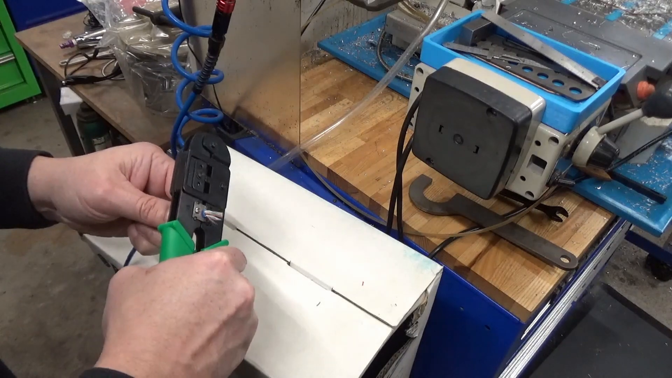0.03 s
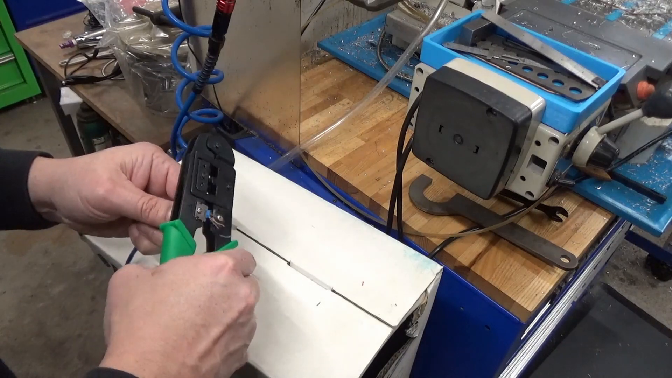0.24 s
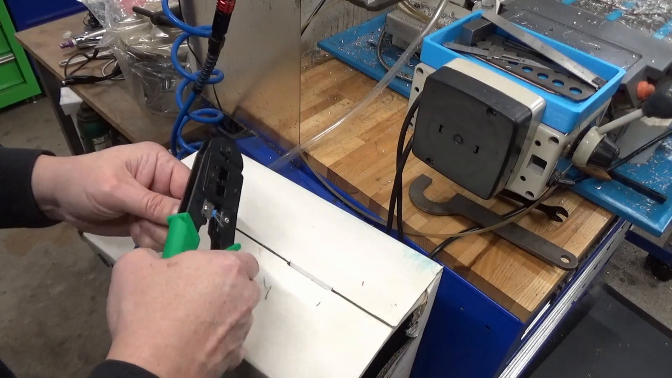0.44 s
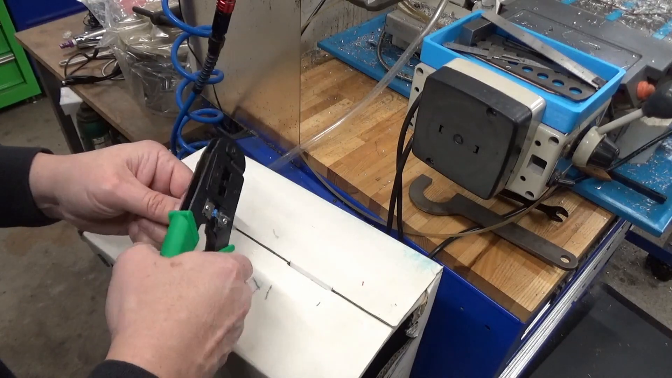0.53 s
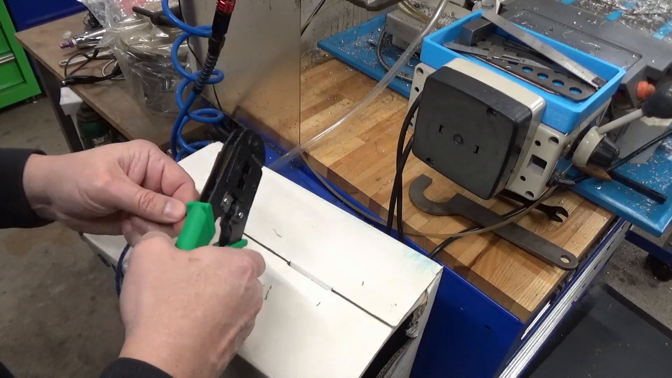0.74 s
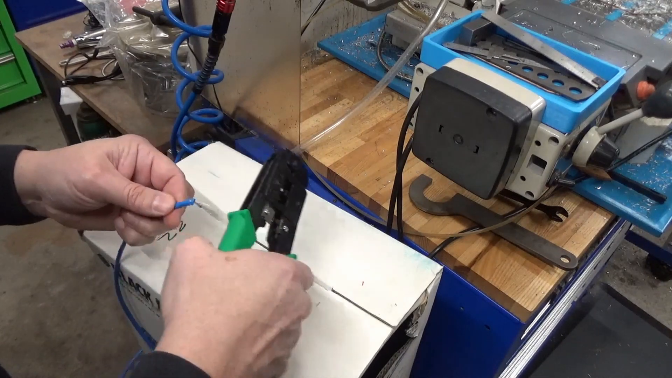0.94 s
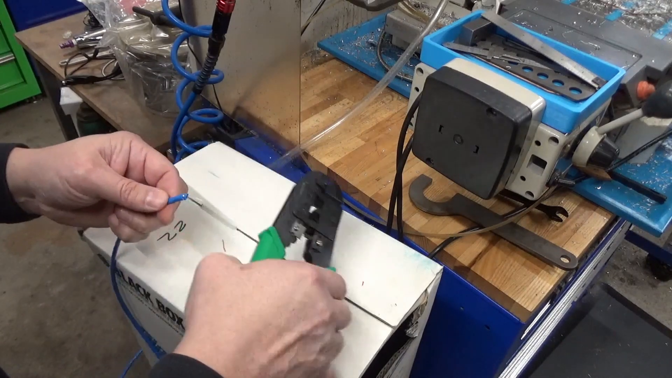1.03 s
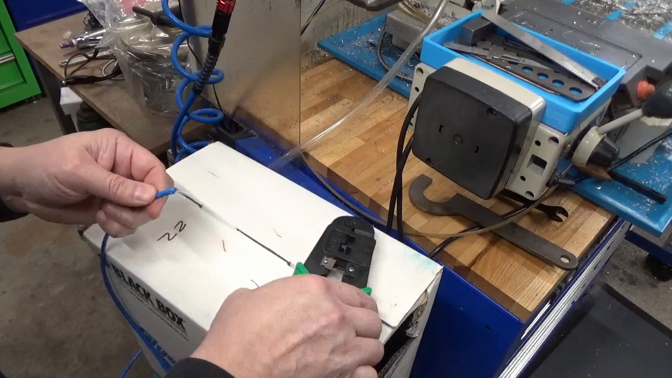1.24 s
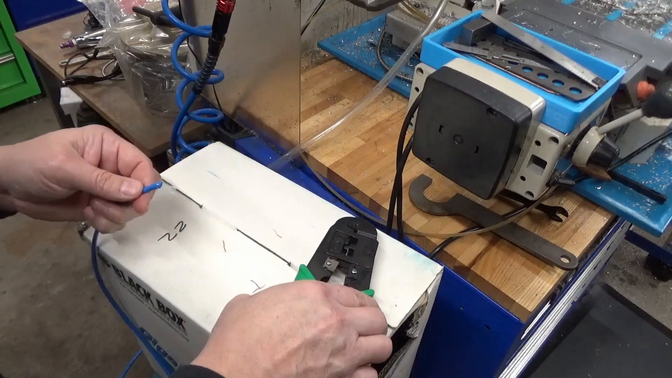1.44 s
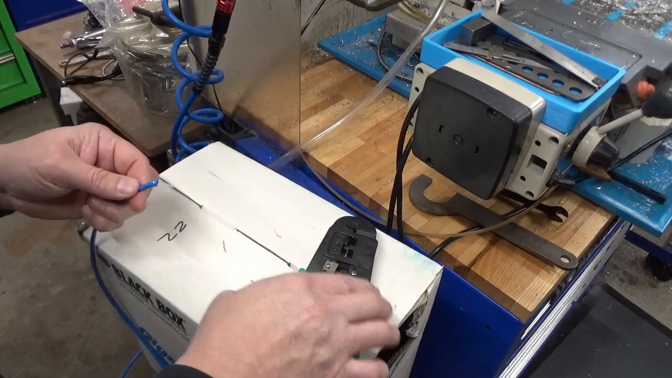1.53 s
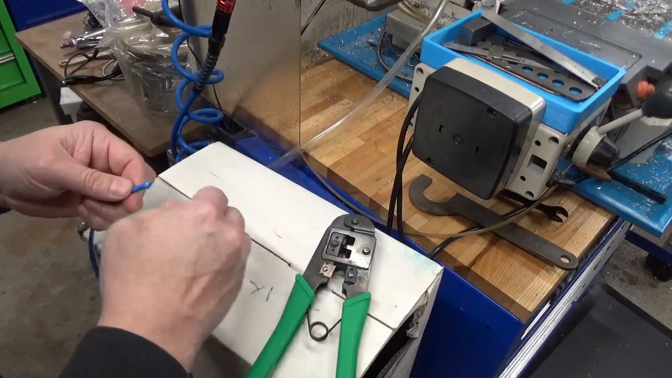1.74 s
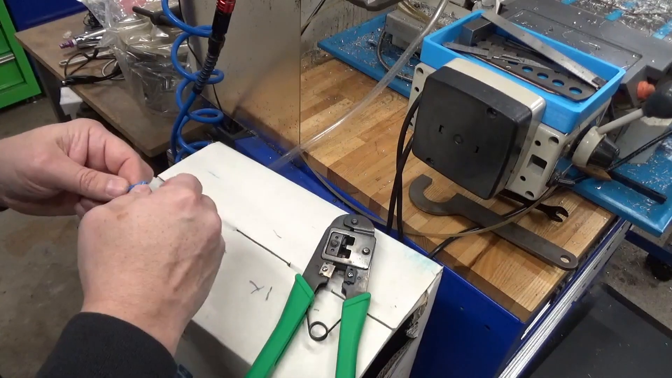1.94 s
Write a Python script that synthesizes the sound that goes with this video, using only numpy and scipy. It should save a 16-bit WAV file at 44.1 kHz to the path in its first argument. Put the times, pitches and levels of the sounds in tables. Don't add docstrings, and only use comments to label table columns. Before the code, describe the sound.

Steel crimping pliers click in a quick burst, pause, then clunk and rattle onto a box

```python
import sys
import numpy as np
from scipy import signal
from scipy.fft import rfft, irfft
from scipy.io import wavfile

SR = 44100
rng = np.random.default_rng(int(sys.argv[2]) if len(sys.argv) > 2 else 0)


def natural_amplitude(level_db):
    exponent = np.asarray(level_db, float) / 20
    return 10 ** exponent


def to_wav(sig):
    pcm = np.clip(np.atleast_2d(sig), -1, 1) * 32767
    pcm = np.round(pcm).astype(np.int16)
    wavfile.write(sys.argv[1], SR, pcm.T)


N = 85995


def rms_one(x):
    return x / np.sqrt(np.mean(x ** 2) + 1e-20)


def high_pass(x, hz):
    return signal.sosfilt(signal.butter(2, hz, "high", fs=SR, output="sos"), x)


def in_time(rows):
    s, *columns = np.transpose(rows)
    t = np.arange(N) / SR
    return [natural_amplitude(np.interp(t, s, column, -120, -120)) for column in columns]


def colour(x, points):
    hz, db = np.transpose(points)
    f = np.maximum(np.arange(N // 2 + 1) * SR / N, 1)
    gain = natural_amplitude(np.interp(np.log(f), np.log(hz), db))
    return rms_one(irfft(rfft(x) * gain, N))


def side_only(x):
    bass_db = -13
    return high_pass(x, 750) + natural_amplitude(bass_db) * x


def wide(source, side_db):
    mid = source()
    side = side_only(source())
    return mid + natural_amplitude(side_db) * side * [[1], [-1]]


def ring(force, hz, t60):
    r, w = natural_amplitude(-60 / (t60 * SR)), 2 * np.pi * hz / SR
    return signal.lfilter([0, np.sin(w)], [1, -2 * r * np.cos(w), r * r], force + 1e-18)


def strike(s, db, modes, contact, centre_hz=None, fall_db=0, sign=-1):
    mode_spread_db, fall_limit_db = 1.5, 22
    out = np.zeros(N)
    spread = mode_spread_db * rng.standard_normal((len(s), len(modes)))
    n = np.arange(contact.shape[1])
    at = (np.clip(s, 0, None) * SR).astype(int)[:, None] + n
    for k, (hz, level_db, t60) in enumerate(modes):
        off_db = 0
        if centre_hz is not None:
            off_db = np.minimum(fall_db * np.log2(hz / centre_hz) ** 2, fall_limit_db)
        push = np.abs(contact @ np.exp(2j * np.pi * hz / SR * n))
        gain = natural_amplitude(db + level_db + spread[:, k] - off_db) / np.maximum(push, .5)
        force = np.zeros(N)
        np.add.at(force, at, gain[:, None] * contact * sign ** k)
        out += ring(force, hz, t60)
    return out


CHATTER_S = .0017


def chatter(count, length_s):
    t = np.arange(200) / SR
    fade = np.exp(-t / length_s - (t / length_s) ** 4)
    force = rng.standard_normal((count, len(t))) * fade
    force[:, 0] = 6.0
    return force / np.sqrt(np.sum(force ** 2, axis=1, keepdims=True))


def grains():
    grains_per_s, spread_db = 5100, 1
    sizes = natural_amplitude(spread_db * np.minimum(rng.exponential(1, N), 5)) * rng.choice([-1, 1], N)
    return sizes * (rng.random(N) < grains_per_s / SR)


# [f/Hz, level/dB]
AIR_COLOUR = [(18, -4.5), (30, -0.5), (65, -32), (121, -6.5), (319, -15.5), (487, -14.5), (1320, -18),
              (9660, -28.5), (11500, -35), (15000, -79), (22000, -120)]


def workshop_air():
    air = wide(lambda: colour(rng.standard_normal(N), AIR_COLOUR), side_db=-3.5)
    hum = rms_one(ring(rng.standard_normal(N), hz=121, t60=0.3))
    duct = rms_one(ring(rng.standard_normal(N), hz=310, t60=0.072))
    return natural_amplitude(-61) * air + natural_amplitude(-68) * hum + natural_amplitude(-69) * duct


FALL_DB = 45

# [f/Hz, level/dB, t60/s]
MOTOR_MODES = [(2630, -1.1, 0.033), (2940, -0.72, 0.029), (3400, -2.2, 0.0092)]


def motor():
    start_s, period_s, level_db = .00882, .03338, -61.5
    s = np.arange(start_s, N / SR - .01, period_s)
    hz = np.where(np.arange(len(s)) % 2, 3140, 2650)
    force = chatter(len(s), CHATTER_S)
    return strike(s, level_db, MOTOR_MODES, force, hz, FALL_DB)


SCRAPE_SIDE_DB = -11

# [t/s, hiss level/dB, box rumble level/dB]
SLIDE = [(0.95, -75, -65), (1.15, -74.5, -57), (1.27, -66.5, -53.5), (1.36, -52.5, -50.5),
         (1.42, -66.5, -56), (1.49, -65.5, -53.5), (1.52, -44.5, -51.5), (1.55, -62, -43.5),
         (1.6, -70, -65), (1.63, -49.5, -38.5), (1.7, -63.5, -55), (1.76, -73, -51.5), (1.85, -67.5, -65)]
# [f/Hz, level/dB]
SLIDE_COLOUR = [(600, -40), (1500, -17), (3000, -8), (4500, -8), (7800, 0), (10600, -5), (11500, -12)]


def sliding():
    hiss_gain = in_time(SLIDE)[0]
    return hiss_gain * wide(lambda: colour(grains(), SLIDE_COLOUR), SCRAPE_SIDE_DB)


# [t/s, level/dB]
STRIP = [
    (.23, -60),
    (.245, -52.5),
    (.3, -45),
    (.39, -51),
    (.46, -46.5),
    (.55, -49.5),
    (.61, -53.5),
    (.66, -62),
]
# [f/Hz, level/dB]
STRIP_COLOUR = [(150, -37), (300, 10), (600, 8.5), (1700, 7.5), (3000, 5.5), (7300, 2), (10700, -3),
                (11500, -39)]


def stripping():
    drag_gain = in_time(STRIP)[0]
    return drag_gain * wide(lambda: colour(grains(), STRIP_COLOUR), SCRAPE_SIDE_DB)


# [t/s, peak level/dB, centre f/Hz]
KNOCKS = [(0.0, -49.5, 324), (1.196, -39, 385), (1.199, -44, 655), (1.294, -21.5, 606), (1.294, -36, 330),
          (1.296, -26, 140), (1.308, -29, 610), (1.377, -22.5, 580), (1.378, -26.5, 358), (1.38, -21, 116),
          (1.405, -35, 514), (1.459, -39.5, 385), (1.527, -27.5, 310), (1.527, -29.5, 560),
          (1.543, -31.5, 570), (1.575, -43, 330), (1.608, -20, 750), (1.612, -21.5, 303), (1.62, -15, 445),
          (1.617, -19, 110), (1.626, -11, 155), (1.643, -21.5, 317), (1.646, -26, 795), (1.664, -26, 334),
          (1.666, -27, 720), (1.689, -33.5, 616), (1.705, -26, 172), (1.729, -25.5, 780),
          (1.742, -30.5, 183)]
# [f/Hz, level/dB, t60/s]
BOX_MODES = [(104, -21, 0.016), (140, -14, 0.074), (172, -6, 0.135), (216, -10.5, 0.062),
             (277, -10.5, 0.061), (329, 0, 0.088), (385, -2, 0.081), (445, 1, 0.047), (532, -10, 0.053),
             (595.4, 0.5, 0.066), (714, -10, 0.041), (780, -4.5, 0.027), (903, 1, 0.011),
             (1330, 11.5, 0.0037)]


def box():
    contact_s, low_hz = .0009, 76
    s, db, hz = np.transpose(KNOCKS)
    push = np.hanning(int(contact_s * SR))[None]
    knocks = strike(s, db - 7, BOX_MODES, push / push.sum(), hz, FALL_DB, sign=0.97)
    rub = grains()
    rumble = rms_one(sum(natural_amplitude(level_db) * ring(rub, f, t60) for f, level_db, t60 in BOX_MODES))
    card = knocks + in_time(SLIDE)[1] * rumble
    return high_pass(high_pass(card, low_hz), low_hz)


# [t/s, jaw level/dB, jaw centre f/Hz, relative blade level/dB, relative handle level/dB]
SNAPS = [(0.2386, -8, 3650, -15, -10.5), (0.2652, -6.5, 3930, -12.5, -10.5), (0.2838, -22.5, 3300, 0, 3.5),
         (0.2910, -7, 4400, -4, -11.5), (0.2931, -9.5, 4300, -0.5, -32), (.33, -13, 2800, -12.5, -16.5),
         (0.3629, -18, 3300, -12.5, -8), (0.402, -17.5, 3340, -19, -26), (0.4097, -22.5, 3500, -2.5, -3),
         (0.4132, -12.5, 3220, -4.5, -13.5), (.424, -24.5, 4100, 8, -2.5), (.4455, -21.5, 3070, 5, -11),
         (0.449, -16, 3150, 2, -9.5), (0.4752, -21.5, 3580, 3, -13.5), (0.478, -28, 3550, 3, -31)]
# [t/s, peak level/dB, centre f/Hz]
TICKS = [(0.1203, -48, 6000), (0.1264, -44, 8000), (.133, -50, 7000), (.1886, -49, 7000), (.201, -50, 9500),
         (.2113, -49, 2800), (.2135, -40, 8500), (.2325, -40, 6000), (0.298, -16.5, 6500),
         (0.3262, -24, 3400), (.354, -23, 4150), (.4915, -29.5, 7260), (.499, -24, 3500), (.507, -31, 4520),
         (0.515, -32, 6500), (0.5215, -24.5, 3520), (0.5265, -23.5, 3800), (0.5345, -30.5, 8800),
         (0.5392, -26.5, 6900), (0.549, -31, 8700), (0.5583, -27, 4420), (.5585, -28, 7600),
         (.5655, -31.5, 7000), (0.573, -32.5, 4540), (.578, -43, 8500), (.5868, -32.5, 6500),
         (.59, -35.5, 3000), (0.602, -35.5, 7000), (0.616, -44.5, 7000), (.935, -40.5, 8360)]
# [t/s, peak level/dB, centre f/Hz]
RATTLE = [(1.18, -46, 2800), (1.249, -47, 2800), (1.262, -41, 2900), (1.2937, -22, 2750),
          (1.302, -35.5, 3520), (1.377, -21, 2750), (1.5242, -26, 2610), (1.6078, -24, 7900),
          (1.6188, -17, 2940), (1.6202, -24, 8000), (1.6248, -26, 3500), (1.6252, -34, 7400),
          (1.629, -34, 4000), (1.643, -28, 3220), (1.6457, -26.5, 7960), (1.656, -45, 3000),
          (1.6676, -30, 4270), (1.677, -39, 4000), (1.685, -37, 3200), (1.6884, -36, 7400),
          (1.6897, -35, 4400), (1.7277, -31.5, 3070), (1.7272, -29.5, 9900), (1.7303, -36.5, 7600),
          (1.74, -41, 9000), (1.756, -38, 5450), (1.8, -39, 6500), (1.8388, -45.5, 6500),
          (1.868, -46, 6400)]
# [f/Hz, level/dB, t60/s]
JAW_MODES = [(2173, -4.5, 0.0094), (2570, -3.5, 0.0076), (2750, -1, 0.0079), (3000, -2.5, 0.014),
             (3300, -1, 0.0063), (3583, -1.5, 0.0074), (4000, -4, 0.0073), (4360, -1, 0.0076),
             (5050, -8.5, 0.0075)]
# [f/Hz, level/dB, t60/s]
BLADE_MODES = [(5720, -1.5, 0.0049), (6500, -5, 0.01), (7085, 1, 0.0036), (8000, -2.5, 0.011),
               (8600, -3, 0.0043), (9580, -3.5, 0.0071), (10743, -6, 0.0067)]
# [f/Hz, level/dB, t60/s]
HANDLE_MODES = [(265, -15, 0.034), (366, -19.5, 0.013), (592.4, -9.5, 0.077), (848, -15, 0.06),
                (987, -12.5, 0.051), (1257, 0, 0.018), (1390, 2.5, 0.0095), (1624, 1, 0.01)]


def tool():
    tick_s, jaw_fall_db, tick_fall_db = .0014, 12, 22
    tick_handle_db, tool_db, low_hz = -10.5, -6, 216

    s, db, hz, blade_db, handle_db = np.transpose(SNAPS)
    force = chatter(len(s), CHATTER_S)
    snaps = strike(s, db, JAW_MODES, force, hz, jaw_fall_db)
    snaps += strike(s, db + blade_db, BLADE_MODES, force)
    snaps += strike(s, db + handle_db, HANDLE_MODES, force)

    s, db, hz = np.transpose(TICKS + RATTLE)
    force = chatter(len(s), tick_s)
    ticks = strike(s, db, JAW_MODES + BLADE_MODES, force, hz, tick_fall_db)
    ticks += strike(s, db + tick_handle_db, HANDLE_MODES, force)
    return natural_amplitude(tool_db) * high_pass(snaps + ticks, low_hz)


def room(x):
    level_db, side_db, t60_s, start_s, dull_hz = -11.5, -5, 0.15, 0.0009, 7000
    t = np.arange(int(.4 * SR)) / SR
    r = np.exp(-2 * np.pi * dull_hz / SR)
    tails = signal.lfilter([1], [1, -r], rng.standard_normal((2, len(t))))
    tails = tails * natural_amplitude(-60 * t / t60_s) * np.clip(t / start_s - 1, 0, 1)
    tails /= np.sqrt(np.sum(tails[0] ** 2))
    mid, side = signal.fftconvolve(x[None], tails, axes=1)[:, :N]
    return natural_amplitude(level_db) * (mid + natural_amplitude(side_db) * side_only(side) * [[1], [-1]])


def scene():
    steel, card = tool(), box()
    into_room = high_pass(steel, 870) + natural_amplitude(-0.5) * card
    background = workshop_air() + motor()
    friction = sliding() + stripping()
    return background + friction + card + steel + room(into_room)


def roll_off(x):
    return signal.sosfilt(signal.butter(12, 12160, fs=SR, output="sos"), x)


def record(dry):
    cutoff_hz, peak_limit = 11250, .5
    low_pass = signal.cheby2(14, 32, cutoff_hz + 150, fs=SR, output="sos")
    cut = signal.sosfilt(low_pass, dry)
    mix = peak_limit * np.tanh(cut / peak_limit)
    return roll_off(mix)


dry = scene()
out = record(dry)
to_wav(out)
```